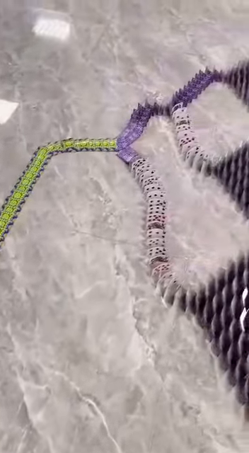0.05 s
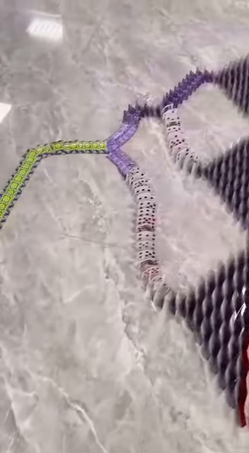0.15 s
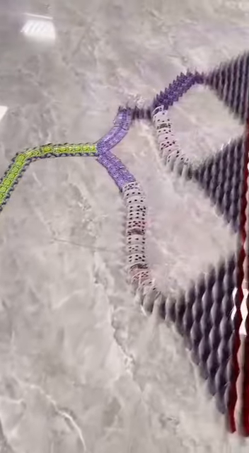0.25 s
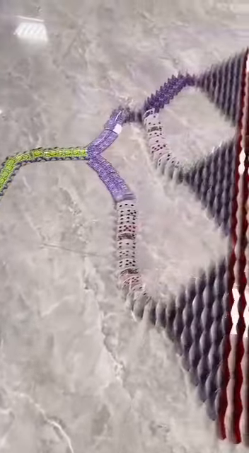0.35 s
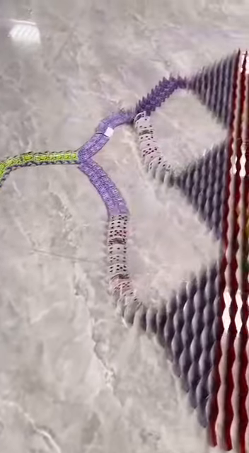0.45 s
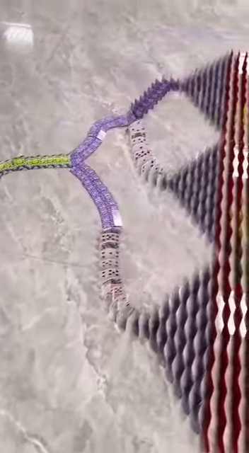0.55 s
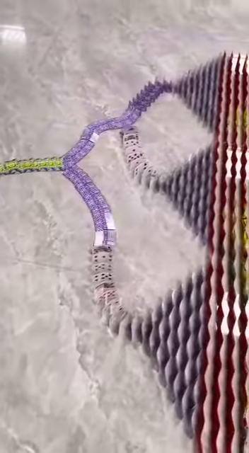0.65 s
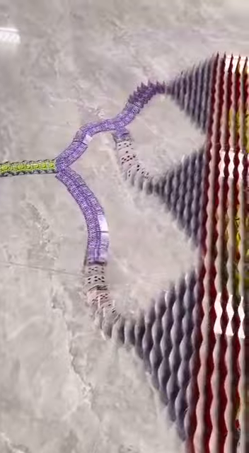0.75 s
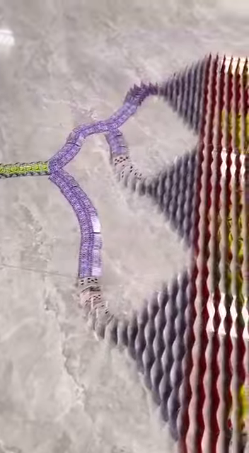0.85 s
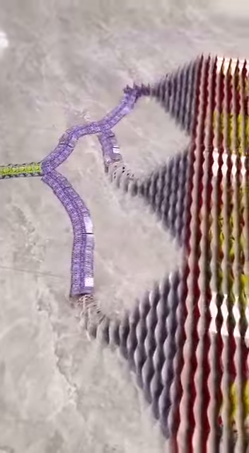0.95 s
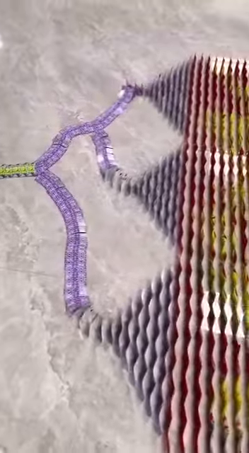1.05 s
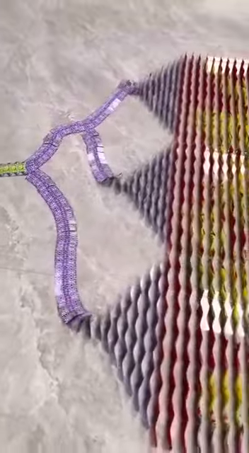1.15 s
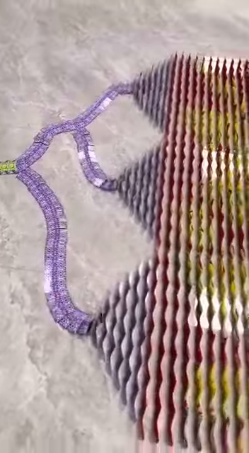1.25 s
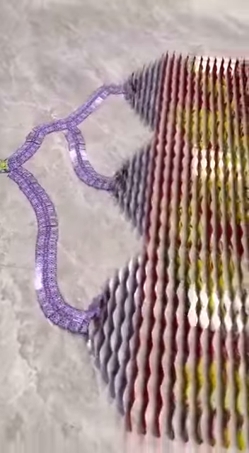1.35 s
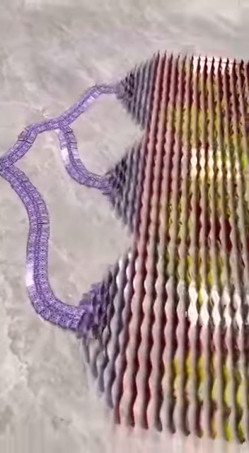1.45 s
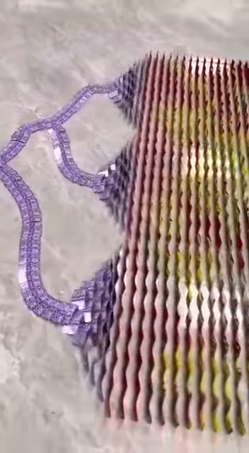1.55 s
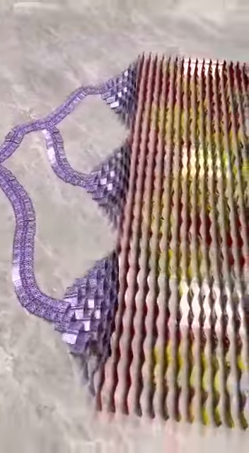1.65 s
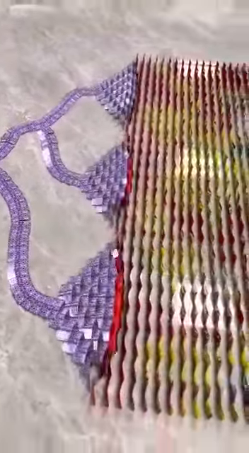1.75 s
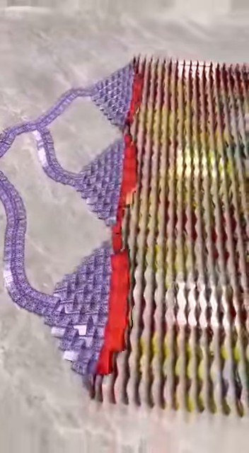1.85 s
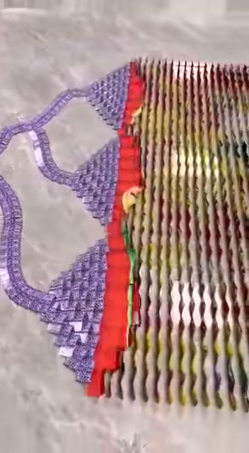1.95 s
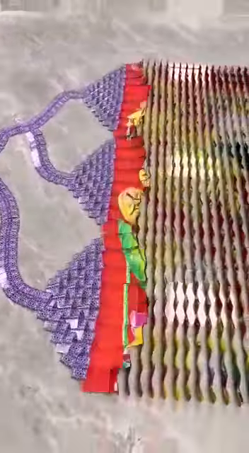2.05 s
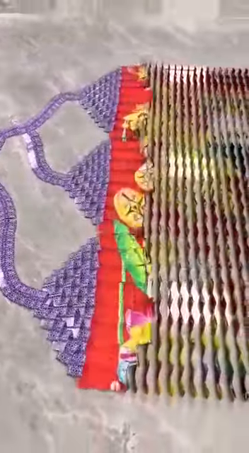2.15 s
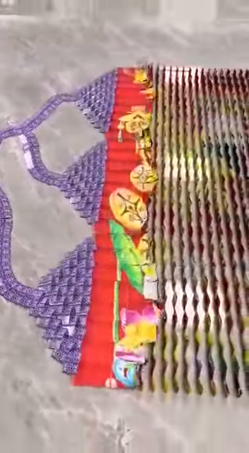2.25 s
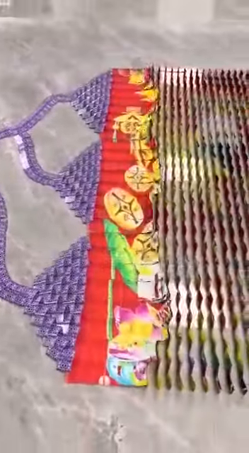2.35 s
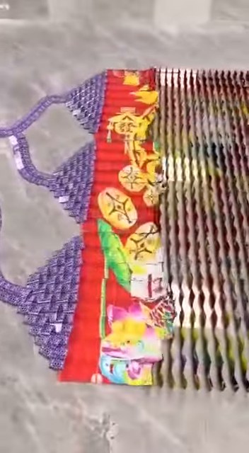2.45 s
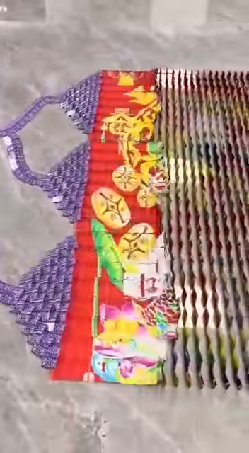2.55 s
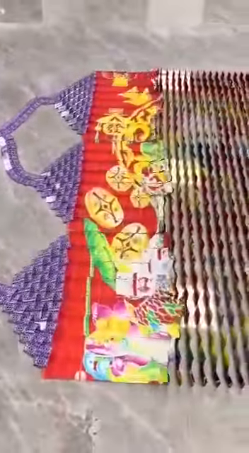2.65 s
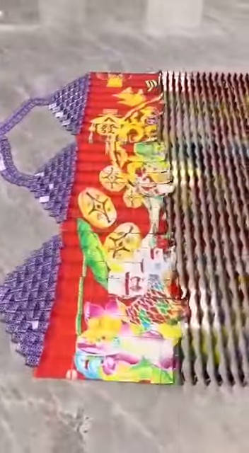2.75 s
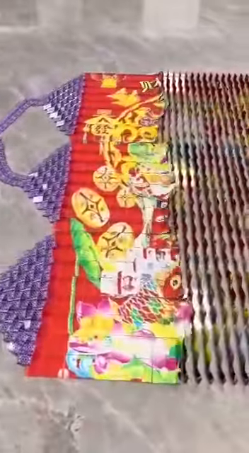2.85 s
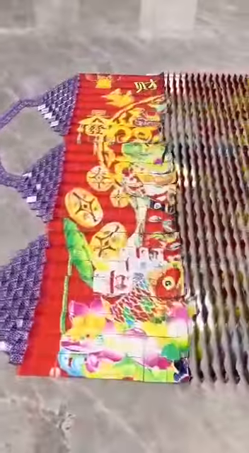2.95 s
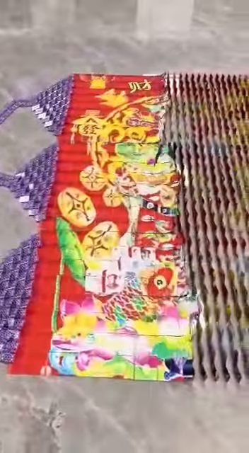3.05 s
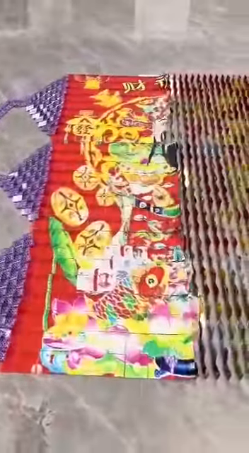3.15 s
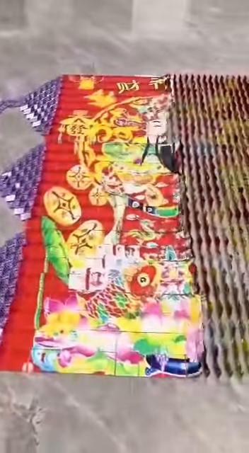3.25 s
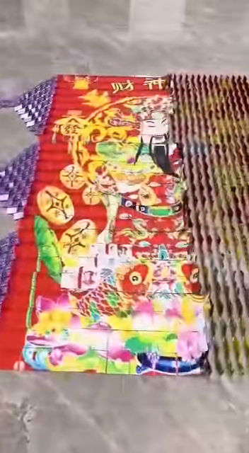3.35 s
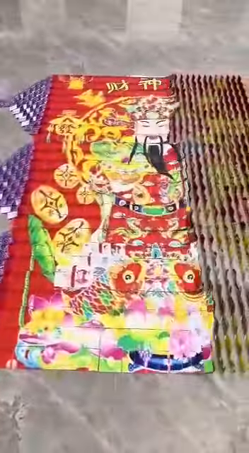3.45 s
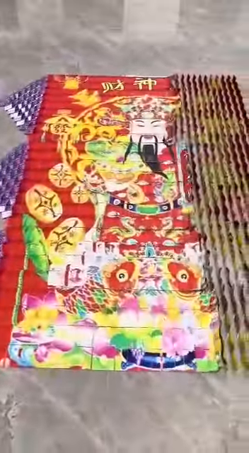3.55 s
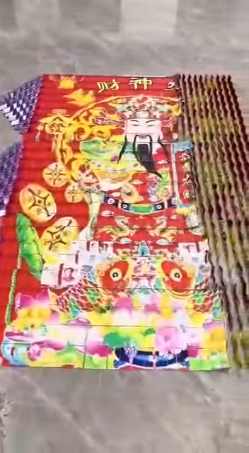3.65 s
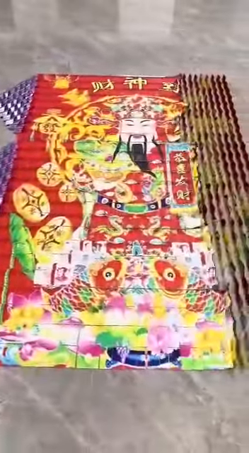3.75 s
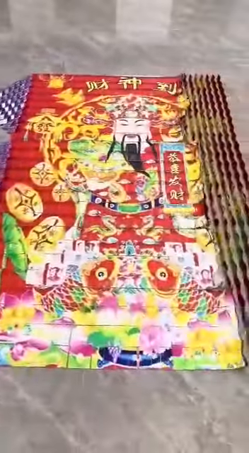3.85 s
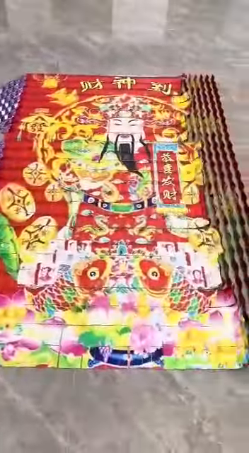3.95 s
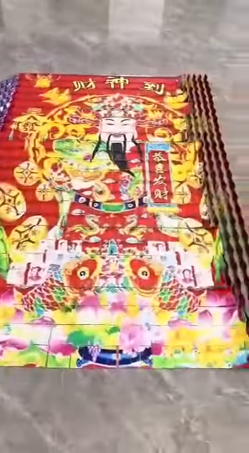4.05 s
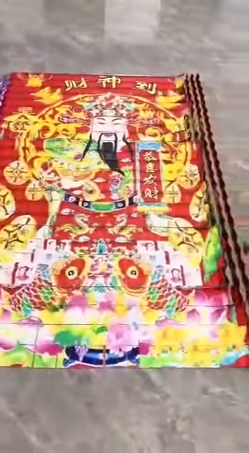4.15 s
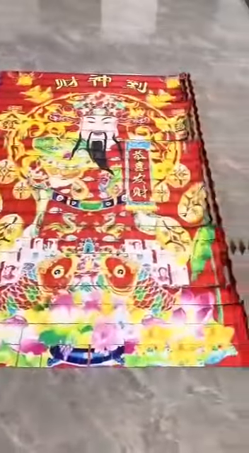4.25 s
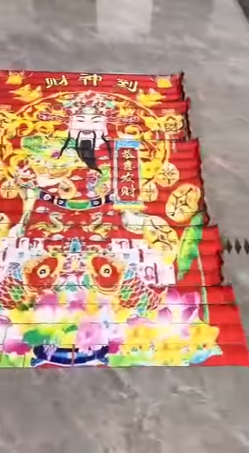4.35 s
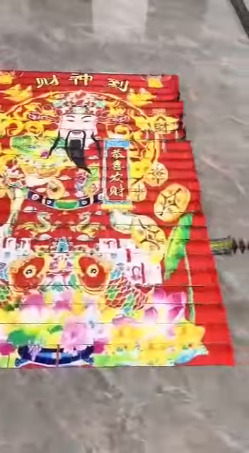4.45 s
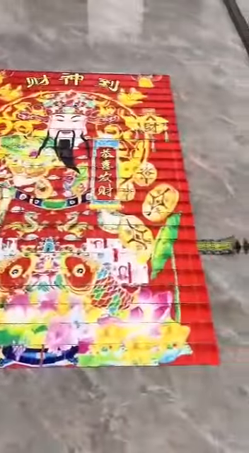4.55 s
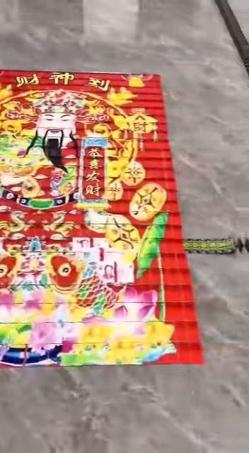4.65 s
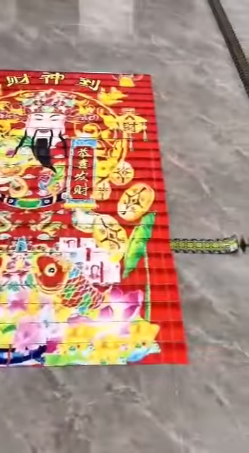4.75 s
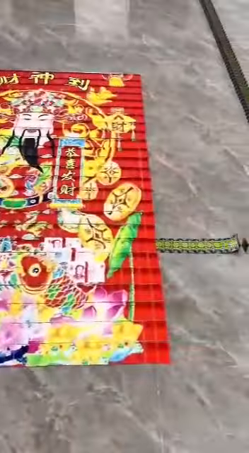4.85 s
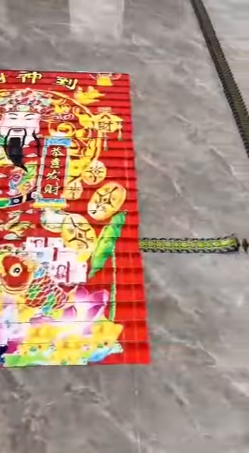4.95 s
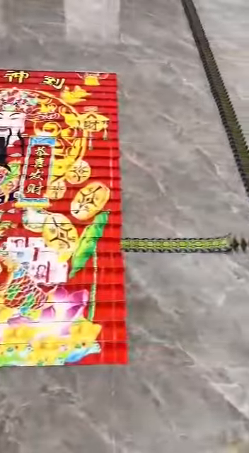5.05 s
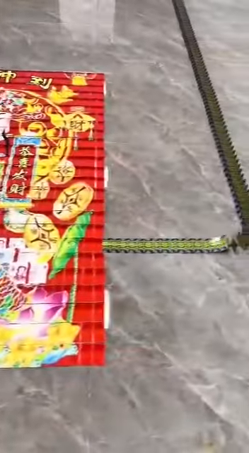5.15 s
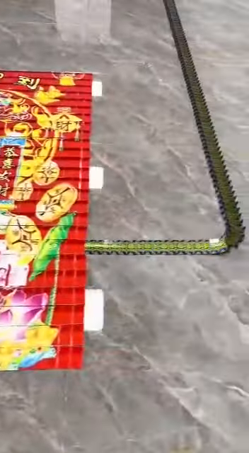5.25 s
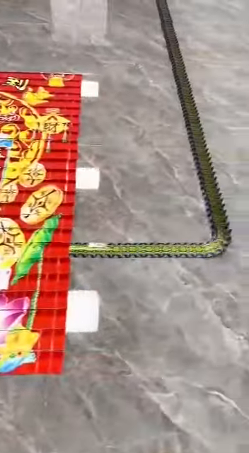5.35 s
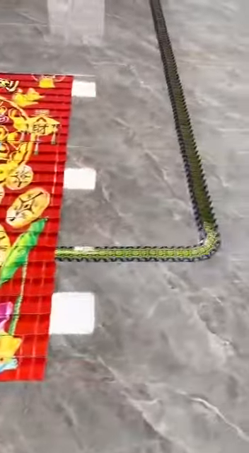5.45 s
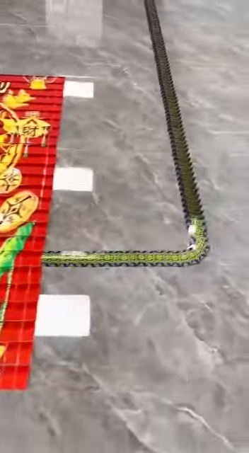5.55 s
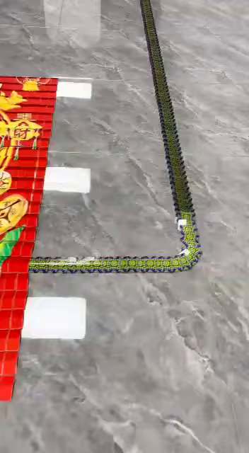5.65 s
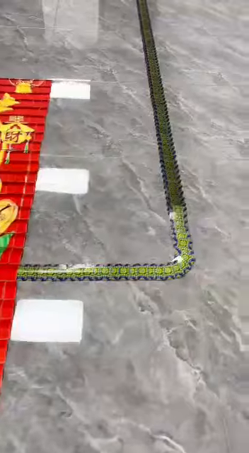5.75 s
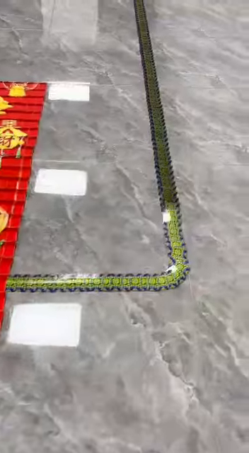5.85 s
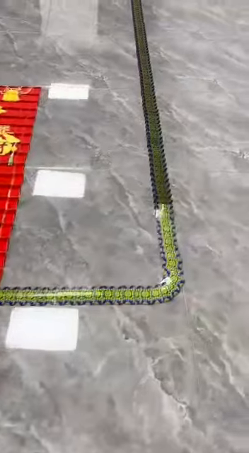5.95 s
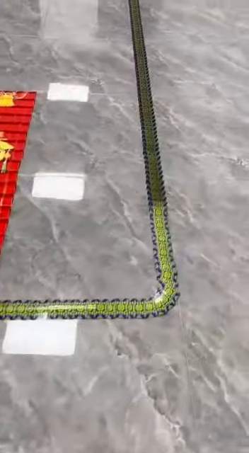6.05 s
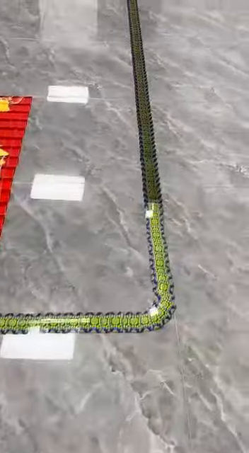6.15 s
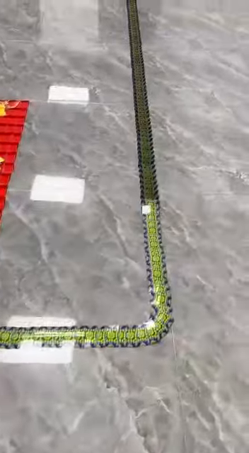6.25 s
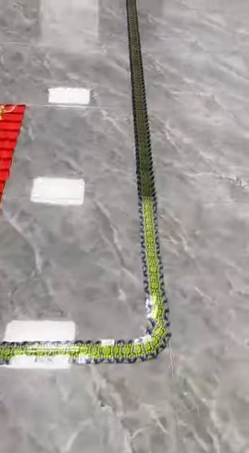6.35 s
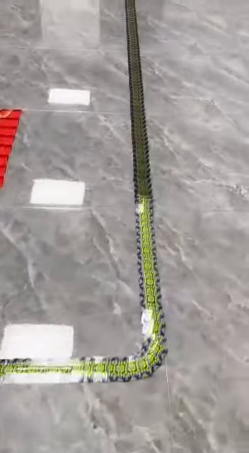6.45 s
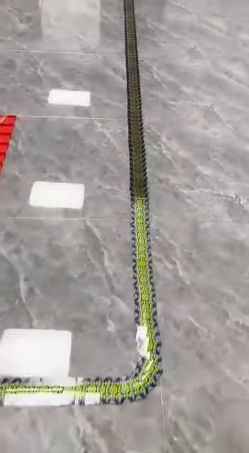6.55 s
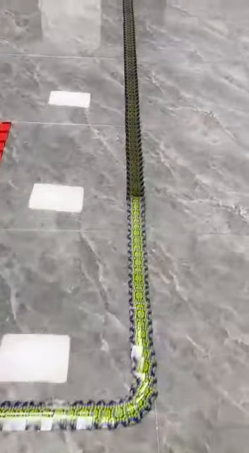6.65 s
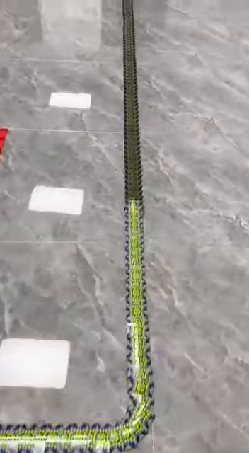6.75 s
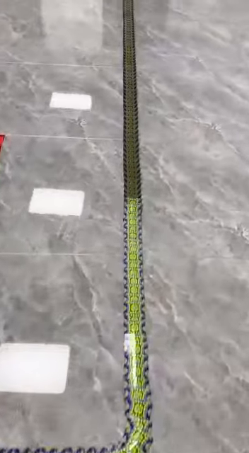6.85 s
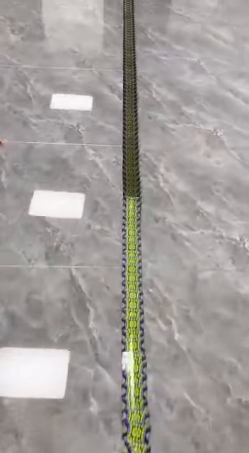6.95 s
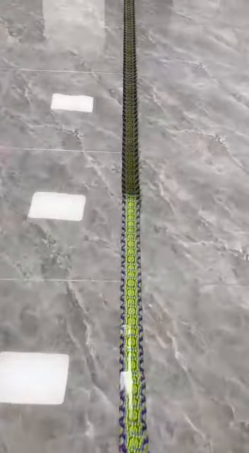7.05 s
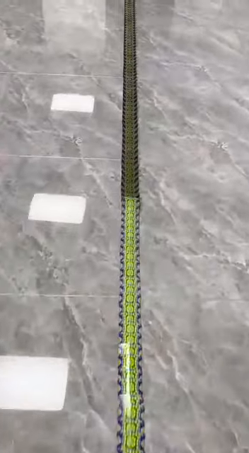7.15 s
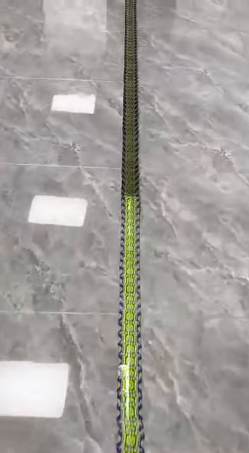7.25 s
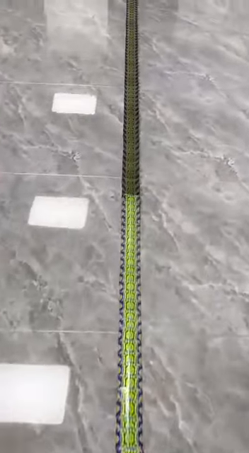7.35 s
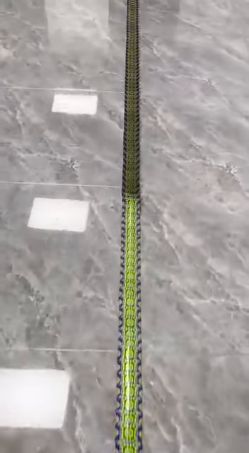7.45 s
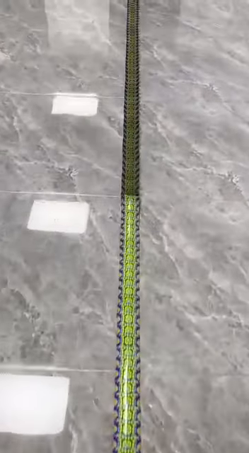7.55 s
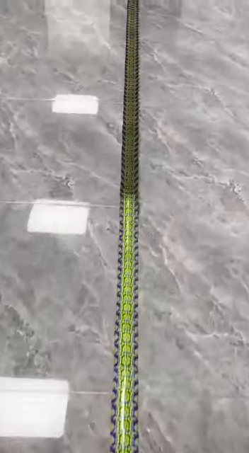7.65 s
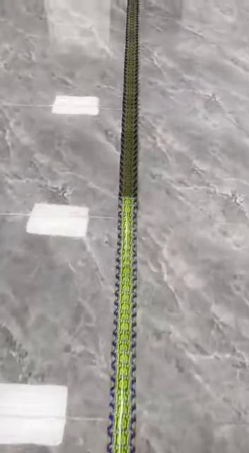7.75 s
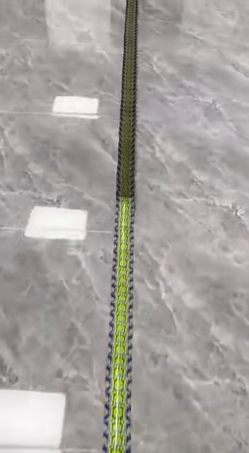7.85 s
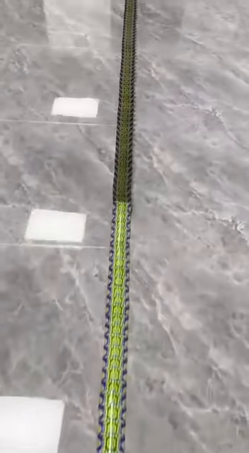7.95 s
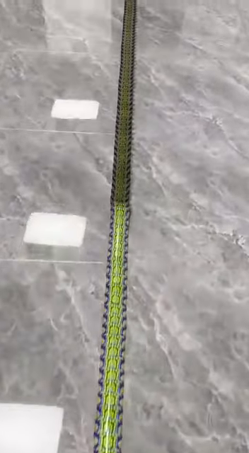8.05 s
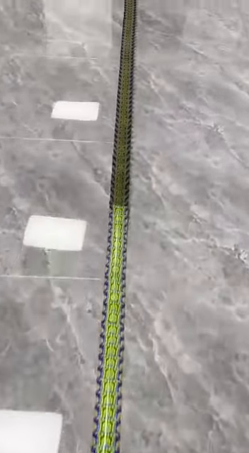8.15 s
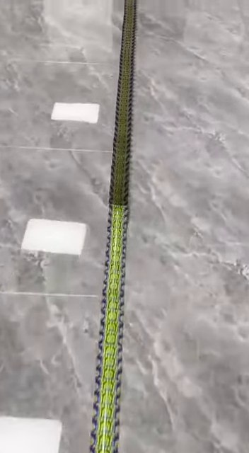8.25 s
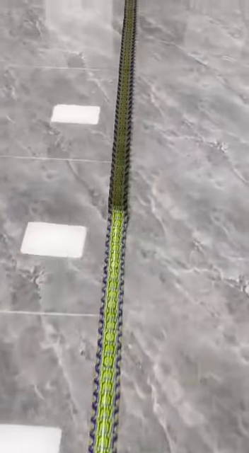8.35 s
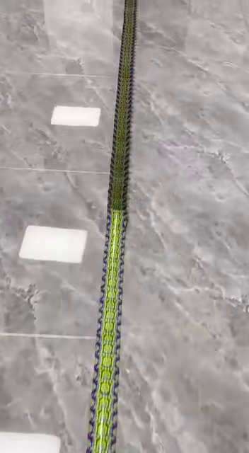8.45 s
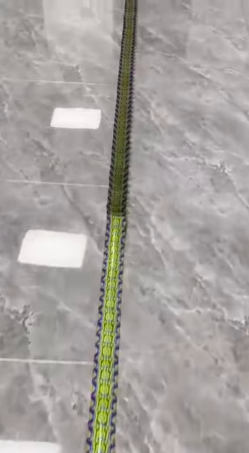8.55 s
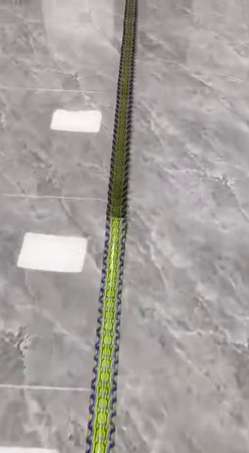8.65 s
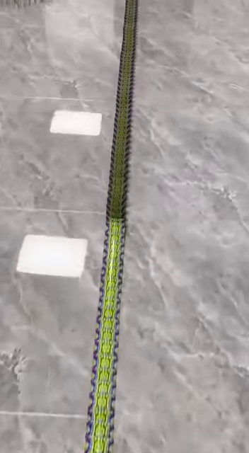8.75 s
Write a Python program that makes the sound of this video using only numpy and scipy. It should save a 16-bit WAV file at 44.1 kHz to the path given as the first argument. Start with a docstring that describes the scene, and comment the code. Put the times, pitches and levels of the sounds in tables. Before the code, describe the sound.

A stone-floored hall with a low soft rumble, heard in close stereo. From 0 seconds, plastic dominoes tick lightly along branching lines, with fine rattling; a dull bump booms near 0.4, and a sharper cluster of clacks peaks around 0.8 to 1.0 before thinning. At about 1.8 a wide field begins to fall: a sudden, dense, hard clatter, row after row, with knocks standing out and bright scraping fizz, staying thick until about 4.5. There the final rows slap flat onto the floor in a quick bunch with a hollow body, and the mass dies away by 4.8. A single line then clicks on, faint and dry at first, clearer from 6.2, about sixteen ticks a second, each with tiny bounces, while fallen tiles rattle behind. Dull thuds come near 5.1 and 7.9; a small spill rattles at 8.6, and clicking continues to the end, around 8.8.

```python
"""Hall with a stone floor: plastic dominoes topple over low noise, dull bumps and a diffuse reverberation.
Branching lines tick into a wide field that falls row by row in a dense clatter; its last rows slap down flat.
A single stacked line then clicks on, about sixteen times a second, with tiles rattling to rest behind it.
Contacts are short sums of decaying modes, hard edges are noise bursts; dense parts are random showers of both."""
import sys
import numpy as np
from scipy import signal
from scipy.fft import rfft, irfft
from scipy.io import wavfile

SR = 44100
rng = np.random.default_rng(int(sys.argv[2]) if len(sys.argv) > 2 else 0)


def to_wav(s):
    """Save 16-bit WAV."""
    ch = np.atleast_2d(s).T  # columns
    pcm = np.round(np.clip(ch, -1, 1) * 32767)  # PCM
    wavfile.write(sys.argv[1], SR, pcm.astype(np.int16))


N = 388521
TIME = np.arange(N) / SR
AGE = np.arange(2048) / SR  # time since a contact, s

# Mode levels are relative: every contact is rescaled as a whole. Frequencies are nominal, before detuning.
# main ring of a tile struck in a line: (f/Hz, level/dB, t60/s)
LINE_MODES = [(1372, -9.5, 0.086), (1553, 6.5, 0.014), (1790, -12, 0.077), (2050, 4.5, 0.036),
              (2340, 1.5, 0.039), (2744, -5.5, 0.075)]
# upper modes of a tile, rung by its hard edge: (f/Hz, level/dB, t60/s)
EDGE_MODES = [(3600, 7.5, 0.19), (4130, 1.5, 0.36), (4850, 8.5, 0.046), (5280, 2.5, 0.015),
              (6000, 3.5, 0.22), (6440, -3.5, 0.21), (7050, -2.5, 0.096), (8340, 7, 0.01), (8400, -3, 0.12),
              (11100, -21, 0.019), (11630, -5, 0.16)]
# a tile's knock on the floor: (f/Hz, level/dB, t60/s)
LOW_MODES = [(690, -0.5, 0.086), (1061, 0.5, 0.095)]
# flat faces cracking together and sliding on one another: (f/Hz, gain/dB)
SCRAPE = [(600, -30), (2200, -7), (3100, -1), (3800, -1), (4500, -4), (5400, -3), (6600, -2), (7500, 1.5),
          (8400, .5), (9700, -4), (11500, -4), (12600, -7), (13200, -13)]
# branching lines, then the single line; levels before trim: (t/s, rattle level/dB, fizz level/dB)
RUNS = [
    [(0, -55, -59.5), (.15, -51.5, -56), (.7, -55, -56), (.86, -50.5, -52.5), (.99, -46, -54),
     (1.4, -53, -54), (1.53, -56.5, -58.5), (1.65, -52, -49.5), (1.78, -50, -54.5)],
    [(4.8, -52.5, -62.5), (5.42, -58, -63.5), (6.08, -60.5, -61.5), (6.24, -60, -62), (7.1, -57.5, -67),
     (7.45, -52.5, -65.5), (8.0, -53.5, -65), (8.47, -64, -67), (8.6, -61, -63), (8.635, -50.5, -57),
     (8.72, -59, -64), (8.81, -66, -70)],
]
# clear steps of a falling line; levels before trim:
# (t/s, ring level/dB, ring f/Hz, hard edge level/dB, topmost snap level/dB, floor knock level/dB)
STEPS = [(0.022, -53, 2470, -72, -78, -60), (0.3534, -49.5, 2390, -63, -75, -55),
         (0.5437, -59, 1650, -59, -59, -53), (0.7327, -60, 1990, -61, -50, -62),
         (0.7696, -48.5, 1893, -49, -50, -51.5), (0.8343, -41.5, 1595, -48, -50, -49),
         (0.9029, -40.5, 2070, -43.5, -46, -51), (0.9681, -31.5, 1700, -38.5, -40.5, -46.5),
         (1.0136, -44, 2340, -54, -49, -60), (1.0363, -46, 1620, -52, -65, -48.5),
         (1.252, -66, 2330, -59, -51, -60), (1.2989, -64, 1760, -61, -53, -60),
         (1.3266, -51, 1860, -52, -55, -52.5), (1.3436, -46, 2150, -55, -70, -57),
         (4.8958, -45.5, 1640, -56, -83, -71), (4.949, -45.5, 1990, -52, -73, -74),
         (5.0077, -40.5, 1560, -51.5, -82, -68), (5.0659, -46, 1810, -50.5, -69, -52),
         (5.1284, -46, 1510, -49, -69, -69), (5.182, -45, 1630, -53, -76, -64),
         (5.2403, -51, 1900, -52, -71, -59), (5.2942, -48, 1810, -47.5, -57, -56),
         (5.3735, -63, 2350, -51.5, -58, -71), (5.419, -77, 1650, -53, -55, -72),
         (5.565, -57, 2280, -54.5, -71, -69), (5.7063, -56, 2230, -57, -66, -70),
         (5.9225, -50.5, 2100, -55, -67, -66), (6.046, -49, 2070, -59, -76, -64),
         (6.1747, -34, 2130, -44.5, -66, -50), (6.2371, -41, 2030, -50, -65, -50),
         (6.3003, -43.5, 2290, -47.5, -62, -50.5), (6.3605, -43.5, 2200, -50, -77, -49.5),
         (6.4206, -44.5, 2070, -50, -70, -58), (6.4752, -38.5, 2080, -45, -66, -51),
         (6.53, -43.5, 1967, -47, -57, -56), (6.5949, -44, 1680, -51.5, -62, -53),
         (6.6555, -44, 1990, -49, -68, -50.5), (6.7183, -44, 2020, -49.5, -68, -54.5),
         (6.7777, -45.5, 1860, -49.5, -66, -61), (6.8348, -32, 2410, -40.5, -45, -54),
         (6.894, -43.5, 2200, -48.5, -63, -50.5), (6.9487, -45.5, 2000, -47.5, -58, -51.5),
         (7.0028, -45, 1940, -49, -69, -63), (7.0626, -41.5, 1790, -48, -68, -54),
         (7.1218, -39.5, 1910, -48, -74, -56), (7.1784, -41, 1710, -46.5, -67, -56),
         (7.2372, -45, 2040, -48.5, -62, -54), (7.2923, -45, 1530, -49.5, -69, -50.5),
         (7.345, -43.5, 2140, -47.5, -58, -46.5), (7.4045, -43.5, 1950, -46.5, -57, -45),
         (7.4672, -45, 1910, -47, -53, -53), (7.532, -45, 2360, -45, -59, -47.5),
         (7.5962, -43, 2040, -45.5, -51, -65), (7.661, -45.5, 1890, -53.5, -75, -50),
         (7.7274, -44, 1520, -49, -65, -49), (7.791, -41, 2140, -49.5, -63, -52),
         (7.8563, -36, 2000, -45, -54, -44), (7.9232, -34, 2060, -46.5, -63, -45.5),
         (7.994, -38, 1750, -53, -77, -47.5), (8.0653, -40, 2080, -50, -68, -44.5),
         (8.1282, -45, 1860, -46, -58, -50), (8.1907, -42, 2080, -47, -54, -52),
         (8.2539, -37, 2170, -46, -64, -59), (8.3168, -36, 2090, -47.5, -52, -51),
         (8.3785, -45, 2370, -45.5, -66, -51), (8.447, -45, 2100, -49.5, -63, -51.5),
         (8.507, -45.5, 1960, -48, -56, -64), (8.5728, -38, 1990, -46.5, -62, -49.5),
         (8.6142, -39, 1790, -48, -55, -52), (8.6401, -40.5, 2190, -49, -71, -64),
         (8.7073, -50, 1790, -48, -65, -55), (8.7731, -41, 2200, -50.5, -66, -50)]
EDGE_HOLD_S = .007  # damping time of the high modes


def gain_of(db):
    """Decibels to gain."""
    return 10 ** (np.asarray(db) / 20)


def evened(x):
    """Scales all channels so that the first (mid) has rms 1."""
    return x / np.sqrt(np.mean(x[0] ** 2) + 1e-20)


def sized(x):
    """Scales a mid-side blow to the mid energy of rms 1 over 10 ms."""
    return x / np.sqrt(np.sum(x[0] ** 2) / 441 + 1e-20)


def read(points, hz):
    """Reads a table along a logarithmic frequency axis."""
    f, value = np.transpose(points)
    return np.interp(np.log(hz + 1), np.log(f + 1), value)


def level(rows, axis=1):
    """Gain over time from one dB column; -120 dB outside the rows."""
    rows = np.asarray(rows)
    return gain_of(np.interp(TIME, rows[:, 0], rows[:, axis], left=-120, right=-120))


def add(mix, s, sound):
    """Mixes a sound in at time s, cut at the end of the mix."""
    part = mix[:, round(s * SR):][:, :sound.shape[1]]
    part += sound[:, :part.shape[1]]


def colour(x, points):
    """Minimum-phase filter with the given spectrum, so attacks stay sharp."""
    hz = abs(np.fft.fftfreq(len(AGE), 1 / SR))
    log_gain = np.log(gain_of(read(points, hz)))
    taps = np.fft.ifft(np.exp(np.conj(signal.hilbert(log_gain)))).real
    return signal.oaconvolve(x, taps[None], axes=1)[:, :x.shape[1]]


def low_cut(x, hz):
    """Small tiles radiate little below their lowest mode."""
    return signal.sosfilt(signal.butter(2, hz, "high", fs=SR, output="sos"), x)


def rumble(rumble_db=-0.5):
    """Low noise of the hall: coloured noise of slowly changing level."""
    # level before trim: (t/s, level/dB)
    swell = [(0, -65.5), (.41, -64.5), (.6, -60.5), (1.55, -62.5), (2.0, -58), (3.1, -70.5), (4.4, -61.5),
             (5.4, -64.5), (5.8, -69), (7.2, -64), (7.9, -60.5), (8.81, -63)]
    # (f/Hz, gain/dB)
    spectrum = [(20, -20), (50, -1), (90, -0.5), (170, 1), (260, -0.5), (450, -1.5), (900, -9),
                (3000, -20.5), (12000, -67)]
    noise = evened(colour(rng.standard_normal((2, N)), spectrum))
    return gain_of(rumble_db) * level(swell) * noise


def bumps(boom_t60_s=1.9, boom_band_hz=(120, 215)):
    """Dull bumps: low modes thud while a decaying noise band, scaled by each pitch, booms."""
    # (t/s, thud level/dB, boom level/dB, pitch factor)
    events = [(.438, -47.5, -56, 1), (1.36, -57, -80, 0.68), (4.258, -50, -71, 0.84),
              (5.09, -58, -74, 0.66), (5.87, -60, -72, .8), (6.18, -60, -68, .4), (7.85, -51, -65, 0.67),
              (7.96, -57, -76, .7), (8.059, -56, -79, 0.62)]
    # (f/Hz, level/dB, t60/s)
    thud_modes = [(100, -10, .05), (160, -2, .07), (195, -1, .14), (320, -2, .035), (450, -6, .025)]
    out = np.zeros((2, N))
    for s, thud_db, boom_db, pitch in events:
        band = signal.butter(3, np.multiply(boom_band_hz, pitch), "band", fs=SR, output="sos")
        boom = evened(signal.sosfilt(band, rng.standard_normal((2, SR))))
        add(out, s, gain_of(boom_db - 60 * TIME[:SR] / boom_t60_s) * boom)
        add(out, s, gain_of(thud_db) * ring(thud_modes, pitch, detune=.03, uneven_db=2))
    return out


def hall(x, delay_s=0.002):
    """Reverberation: the mid convolved with a diffuse noise tail whose top treble dies first."""
    # (f/Hz, t60/s)
    decay = [(150, 0.45), (700, 1.7), (2000, 1.96), (4000, 2.23), (5600, 1.2), (13000, 0.027)]
    hz, t, z = signal.stft(rng.standard_normal((2, SR)), SR, nperseg=256)
    z = z * gain_of(-60 * t / read(decay, hz)[:, None])
    tail = signal.istft(z, SR, nperseg=256)[1][:, :SR]
    tail *= np.clip(TIME[:SR] / delay_s - 1, 0, 1)
    return signal.fftconvolve(x[:1], tail / np.linalg.norm(tail[0]), axes=1)[:, :N]


def ring(modes, pitch, detune, uneven_db):
    """One contact: every tile is tuned a little differently and struck at another spot."""
    rise_s = .0003  # the contact builds up
    hz, db, t60_s = np.transpose(modes)[:, :, None]
    hz = hz * pitch * np.exp(detune * rng.standard_normal(hz.shape))
    shape = (2,) + hz.shape
    size = gain_of(db + uneven_db * rng.standard_normal(shape)) * rng.choice([-1, 1], shape)
    waves = size * np.sin(2 * np.pi * hz * AGE) * gain_of(-60 * AGE / t60_s)
    return sized(waves.sum(1) * (1 - np.exp(-AGE / rise_s)))


def crack(t60_s, rise_s=0.00096):
    """Two hard edges meeting: a brief burst of decaying noise."""
    envelope = (1 - np.exp(-AGE / rise_s)) * gain_of(-60 * AGE / t60_s)
    return sized(rng.standard_normal((2, len(AGE))) * envelope)


def pinched(x, hold_s):
    """A tile rings freely for a moment, then is damped against its neighbour."""
    return sized(x * np.exp(-(AGE / hold_s) ** 2))


def strike(modes, pitch, rebound, rebound_s):
    """A tile meets the next with a blow and a rebound a few milliseconds later at most."""
    blow, again = (ring(modes, pitch, detune=.045, uneven_db=4) for _ in range(2))
    add(blow, rebound_s * rng.uniform(.4, 1.621), rebound * again)
    return sized(blow)


def clack(hz, modes, pitch, t60_s, others_db, hold_s):
    """One main mode, the tile's other modes around it, and a quick damping."""
    main = ring([(hz, 0, t60_s)], 1, detune=0, uneven_db=0)
    others = strike(modes, pitch, rebound=0.96, rebound_s=0.00198)
    return pinched(main + gain_of(others_db) * others, hold_s)


def shower(grain, per_s, spread_db, count=32):
    """Many contacts at random moments, a few much harder than the rest, from `count` different grains."""
    out = np.zeros((2, N + len(AGE)))
    hits = max(int(per_s * N / SR / count), 1)
    for _ in range(count):
        sound = grain()
        when, luck = rng.random((hits, 2)).T
        sizes = gain_of(-spread_db * np.log(luck * .95 + .05))
        for at, size in zip((when * N).astype(int), sizes):
            out[:, at:at + len(AGE)] += size * sound
    return evened(out[:, :N])


def surge(rate_hz, depth_db):
    """Tiles fall in bunches: a random swell whose spectrum peaks at the given rate."""
    hz = np.fft.rfftfreq(N, 1 / SR)
    shape = hz / rate_hz * np.exp(-hz / rate_hz)
    wave = irfft(rfft(rng.standard_normal(N)) * shape, N)
    return evened(gain_of(depth_db * wave / wave.std())[None])


def settling(rattle_db=-2.5, low_db=-8, tick_db=-4, fizz_db=-3.5):
    """Fallen tiles slide, chatter and tick on one another behind the front: showers of rings and cracks."""
    # hard edges meeting and scraping: (f/Hz, gain/dB)
    fizz_spectrum = [(600, -8), (2200, -15), (3100, -8), (3800, -24), (4500, -29), (5400, -4.5), (6600, -2),
                     (7500, 1.5), (8400, 2), (9700, -5), (11500, -5.5), (13500, -24)]
    rattle = shower(lambda: ring(LINE_MODES, 1, detune=.1, uneven_db=4), per_s=420, spread_db=3.6, count=96)
    knocks = shower(lambda: ring(LOW_MODES, 1, detune=.12, uneven_db=4), per_s=400, spread_db=2.5)
    ticks = shower(lambda: pinched(ring(EDGE_MODES, 1, detune=.06, uneven_db=5), .012),
                   per_s=400, spread_db=3.2, count=64)
    cracks = shower(lambda: crack(t60_s=.013), per_s=1000, spread_db=2.2, count=64)
    fizz = evened(colour(cracks, fizz_spectrum))
    body, edge = (sum(level(rows, axis=k) for rows in RUNS) for k in (1, 2))
    dull = low_cut(gain_of(rattle_db) * rattle + gain_of(low_db) * knocks, 465)
    bright = (gain_of(tick_db) * ticks + gain_of(fizz_db) * fizz) * surge(5, depth_db=1.4)
    return (body * dull + edge * bright) * surge(9, depth_db=.9)


def slaps(slap_db=-1, rise_s=0.005):
    """With nothing left to lean on, bunches of tiles smack the stone: decaying bursts of a dense shower."""
    # field's last rows and small spills from the lines; levels before trim: (t/s, level/dB, bouncing t60/s)
    bunches = [(0.985, -48, 0.35), (4.447, -32.5, 0.15), (4.488, -31.5, 0.051), (4.515, -36, 0.14),
               (4.557, -33, 0.41), (8.619, -42.5, 0.18)]
    # (f/Hz, level/dB, t60/s)
    modes = [(1830, -4, 0.0062), (2490, 9.5, 0.0087), (3140, 1, 0.022), (3710, 0.5, 0.026),
             (4070, -4, 0.08), (4530, 2.5, 0.014), (5750, -1, 0.04), (6100, 1.5, 0.016), (7380, 1, 0.017),
             (8840, 2, 0.0094), (9730, -1, 0.012), (11540, -3, 0.021)]
    smacks = shower(lambda: ring(modes, 1, detune=.04, uneven_db=4), per_s=1000, spread_db=2, count=64)
    bursts = np.zeros(N)
    for s, db, t60_s in bunches:
        rise = np.clip(1 + (TIME - s) / rise_s, 0, 1)
        bursts += rise * gain_of(db - 60 * np.maximum(TIME - s, 0) / t60_s)
    return gain_of(slap_db) * bursts * low_cut(smacks, 540)


def hollow(hollow_db=-3):
    """The wedge of air under whole rows falling together gives a hollow body: a shower of low modes."""
    # level before trim: (t/s, level/dB)
    swell = [(1.8, -75), (2.1, -57), (2.6, -64), (3.7, -67.5), (4.36, -56.5), (4.55, -49.5), (4.7, -57),
             (4.85, -63)]
    # (f/Hz, level/dB, t60/s)
    modes = [(264, 1.8, 0.063), (345, 0, 0.1), (421, 0.85, 0.081)]
    body = shower(lambda: ring(modes, 0.98, detune=0.094, uneven_db=1.0), per_s=270, spread_db=1.5)
    return gain_of(hollow_db) * level(swell) * low_cut(body, 163)


def landings(knock_db=-4, edge_db=-16):
    """Where a stretch of a row lands at once, a knock stands out of the clatter."""
    # rows that land hardest; levels before trim: (t/s, level/dB, ring f/Hz)
    knocks = [(1.8093, -32.5, 1280), (1.818, -30, 1220), (1.832, -35, 1800), (1.928, -32.5, 1890),
              (1.97, -28, 1770), (2.075, -30, 1830), (2.131, -30, 1690), (2.157, -30, 1670),
              (2.179, -29, 1700), (2.236, -32.5, 1310), (2.312, -28, 1760), (2.354, -33, 1220),
              (2.394, -26.5, 1610), (2.524, -28.5, 1686), (2.549, -33, 1880), (2.611, -28, 1726),
              (2.624, -32, 1630), (2.637, -32, 1750), (2.707, -27, 1660), (2.828, -28, 1690),
              (2.861, -32, 1830), (2.985, -33, 1520), (3.011, -38, 1790), (3.024, -35, 1770),
              (3.114, -32.5, 1263), (3.181, -38, 1810), (3.201, -35, 1645), (3.28, -36, 1810),
              (3.343, -35, 1200), (3.371, -32, 1770), (3.445, -33.0, 1720), (3.538, -34, 1700),
              (3.619, -31, 1790), (3.642, -35, 1810), (3.701, -32, 1620), (3.715, -31.5, 1270),
              (3.773, -35, 1350), (3.846, -30.0, 1220), (3.872, -30, 1720), (3.888, -30.0, 1750),
              (3.936, -29.5, 1270), (3.956, -29, 1200), (3.995, -35, 1740), (4.06, -31.0, 1220),
              (4.141, -29.5, 1840), (4.238, -30, 1685), (4.273, -31.5, 1810), (4.291, -29.5, 1175),
              (4.356, -31, 1680), (4.372, -31.0, 1690), (4.397, -28.5, 1866), (4.444, -35, 1690),
              (4.466, -33, 1685), (4.552, -29.5, 1740)]
    # modes beside the main pitch: (f/Hz, level/dB, t60/s)
    row_modes = [(692, -10, 0.018), (1263, 1.5, 0.026), (1427, -2, 0.039), (1694, -4.5, 0.058),
                 (1796, 1.5, 0.032), (2430, -8, 0.011)]
    out = np.zeros((2, N))
    for s, db, hz in knocks:
        blow = clack(hz, row_modes, 1, t60_s=0.058, others_db=-3.5, hold_s=0.015)
        edge = ring(EDGE_MODES, 0.97, detune=0.0584, uneven_db=10)
        add(out, s, gain_of(db + knock_db) * (blow + gain_of(edge_db) * edge))
    return out


def field(clatter_db=-1.46):
    """Whole rows strike the next ones: a dense shower of rings, knocks and the fizz of scraping edges."""
    # clatter level before trim: (t/s, clatter level/dB, fizz level/dB)
    fall = [(1.76, -61, -55), (1.805, -45, -48), (1.82, -40, -46.5), (1.97, -38, -44.5),
            (2.42, -35.5, -45.5), (3.05, -37, -46), (3.95, -35, -45.5), (4.57, -36.5, -45),
            (4.64, -40.5, -47.5), (4.74, -45, -64), (4.85, -54, -70)]
    # packed tiles: (f/Hz, level/dB, t60/s)
    modes = [(566, -14.5, 0.031), (674, -8, 0.019), (818, -13, 0.027), (1121, -15.5, 0.05),
             (1230, -3.5, 0.023), (1609, -10, 0.055), (1778, 3, 0.013), (2354, -9, 0.032),
             (2787, -11, 0.016), (3572, -21.5, 0.048), (4740, -29, 0.014)]
    # extra modes of the first rows: (f/Hz, level/dB, t60/s)
    first_modes = [(2280, 1, .025), (2632, 0, 0.053)]
    # their strength: (t/s, level/dB)
    first_rows = [(1.805, -52), (1.815, -46.5), (2.0, -45.5), (2.3, -54), (2.6, -55)]
    clatter = shower(lambda: ring(modes, 1, detune=.04, uneven_db=4), per_s=650, spread_db=3.2, count=200)
    clatter *= gain_of(clatter_db) * level(fall, axis=1) * surge(25, depth_db=1.1)
    first = shower(lambda: ring(first_modes, 1, detune=.06, uneven_db=4), per_s=260, spread_db=3)
    clatter += level(first_rows) * first
    cracks = shower(lambda: crack(t60_s=.014), per_s=1900, spread_db=2.2, count=128)
    fizz = evened(colour(cracks, SCRAPE)) * level(fall, axis=2) * surge(8, depth_db=.8)
    return low_cut(clatter + landings(), 460) + fizz + hollow()


def bounces(bounce_db=-9, loss_db=-3, edge_db=-13, gap_s=.006, most_db=-40, count=3):
    """After each clear step the tile chatters on its neighbour, on average ever weaker and at wider gaps."""
    out = np.zeros((2, N))
    for onset, body_db, *_ in STEPS:
        waits = np.cumsum(gap_s * np.arange(1, count + 1) * rng.uniform(.5, 1.5, count))
        for k, wait in enumerate(waits):
            db = min(body_db, most_db) + bounce_db + k * loss_db + rng.uniform(-3, 3)
            body = ring(LINE_MODES, 1, detune=.12, uneven_db=4)
            edge = ring(EDGE_MODES, 1, detune=.06, uneven_db=5)
            add(out, onset + wait, gain_of(db) * pinched(body + gain_of(edge_db) * edge, EDGE_HOLD_S))
    return low_cut(out, 400)


def steps():
    """The clear steps, and faint ones spaced evenly between them while a line is running."""
    # levels before trim: (ring level/dB, ring f/Hz, hard edge level/dB, snap level/dB, floor knock level/dB)
    faint = (-57, 1973, -68, -78, -78)
    beat_s = .062  # about one tile per beat
    rows = [tuple(row) for row in STEPS]
    for run in RUNS:
        marks = [row[0] for row in STEPS if run[0][0] <= row[0] <= run[-1][0]]
        for start, end in zip(marks, marks[1:]):
            count = max(round((end - start) / beat_s), 1)
            rows += [(s, *faint) for s in np.linspace(start, end, count + 1)[1:-1]]
    return rows


def line(edge_db=-4, crack_db=-1, main_hz=1950, delay_s=.0007, floor_delay_s=0.001397,
         hard_db=(-44, -34), snap_ring_db=-5):
    """Each step rings the tile's low, main and high modes with a crack on top; hard blows are damped soonest."""
    # highest modes of a tile: (f/Hz, level/dB, t60/s)
    snap_modes = [(10900, -13, .012), (11100, 1, 0.049), (11460, 9, 0.037), (12300, -19, 0.01)]
    # free ringing of the main modes: (after a light blow/s, after a hard blow/s)
    hold_range_s = (.011, .005)
    rings, cracks, snaps = np.zeros((3, 2, N))
    for onset, body_db, hz, high_db, top_db, low_db in steps():
        s = onset + delay_s
        hold_s = np.interp(body_db, hard_db, hold_range_s)
        low_pitch, edge_pitch = np.exp(0.057 * rng.standard_normal(2))
        knock = pinched(ring(LOW_MODES, low_pitch, detune=.1, uneven_db=4), .007)
        body = clack(hz, LINE_MODES, np.sqrt(hz / main_hz), t60_s=0.053, others_db=0.5, hold_s=hold_s)
        edge = pinched(strike(EDGE_MODES, edge_pitch, rebound=0.89, rebound_s=0.0019), EDGE_HOLD_S)
        snap_ring = ring(snap_modes, 1.0, detune=0.0194, uneven_db=2.5)
        snap = sized(gain_of(snap_ring_db) * snap_ring + crack(t60_s=0.0063))
        add(rings, onset + floor_delay_s, gain_of(low_db) * knock)
        add(rings, s, gain_of(body_db) * body)
        add(rings, s, gain_of(high_db + edge_db) * edge)
        add(cracks, s, gain_of(high_db + crack_db) * crack(t60_s=0.0077))
        add(snaps, s, gain_of(top_db) * snap)
    return low_cut(rings, 416) + colour(cracks, SCRAPE) + low_cut(snaps, 7300)


def scene(hall_db=-10, line_hall_db=-12):
    """Mid-side mix to left and right; the steps of a line sound drier than the field."""
    # filter of the side channel: (f/Hz, gain/dB)
    width = [(60, -10), (300, -9), (660, -6.5), (1200, -10), (2100, -18), (3000, 3), (4500, -4),
             (13000, -0.5)]
    background = rumble() + bumps()
    mass = settling() + slaps() + field()
    front = bounces() + line()
    reverb = hall(gain_of(line_hall_db) * front + gain_of(hall_db) * mass)
    both = background + reverb + mass + front
    mid, side = both[0], colour(both[1:], width)[0]
    return np.array([mid + side, mid - side]) * gain_of([[-.35], [.35]])


def record(dry):
    """Band limit: a linear-phase low-pass."""
    edge_hz = 13100
    taps = signal.firwin(401, edge_hz, window=("kaiser", 8), fs=SR)
    return signal.oaconvolve(dry, taps[None], "same")


dry = scene()
out = record(dry)
to_wav(out)
```